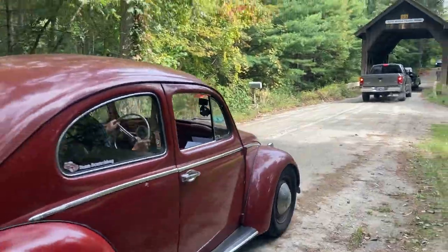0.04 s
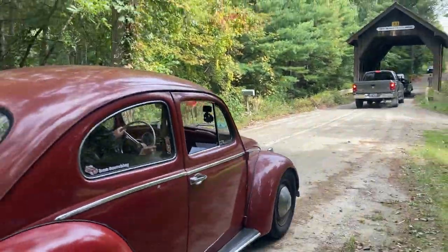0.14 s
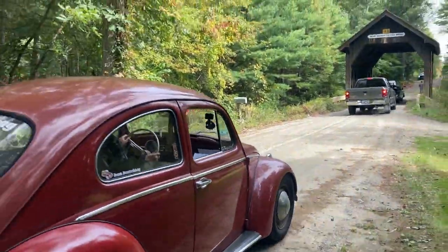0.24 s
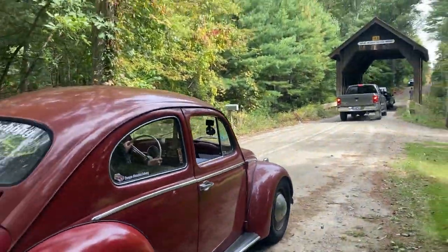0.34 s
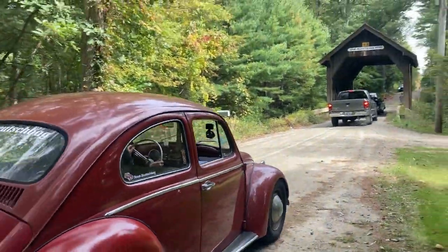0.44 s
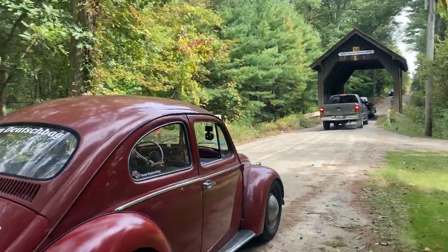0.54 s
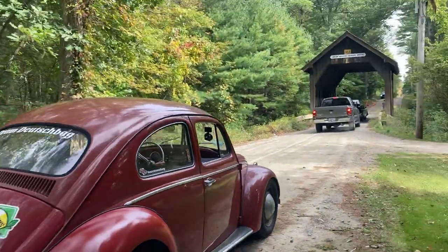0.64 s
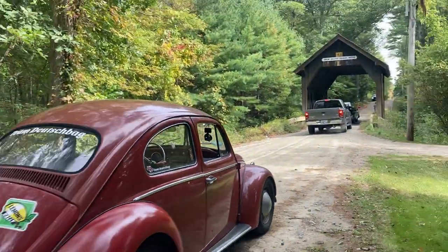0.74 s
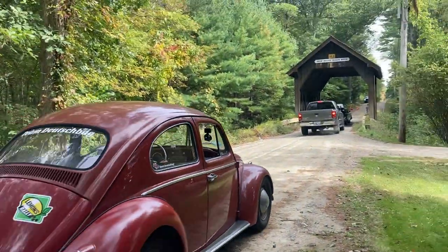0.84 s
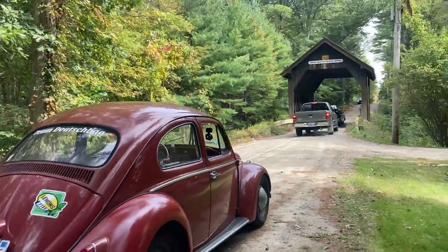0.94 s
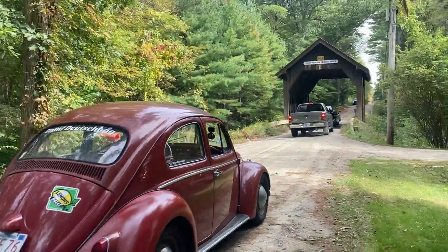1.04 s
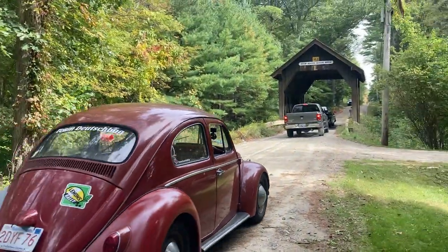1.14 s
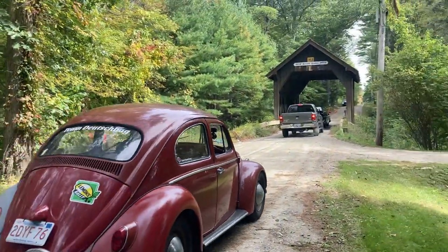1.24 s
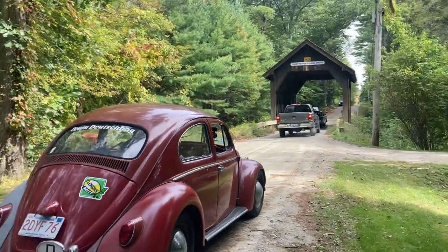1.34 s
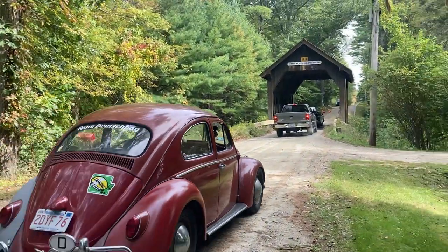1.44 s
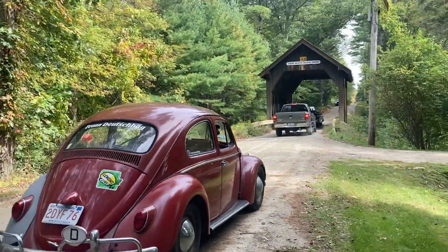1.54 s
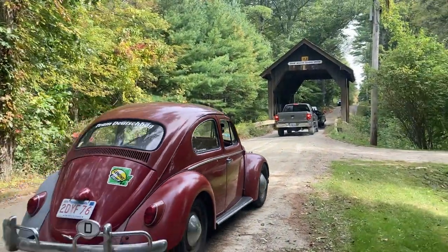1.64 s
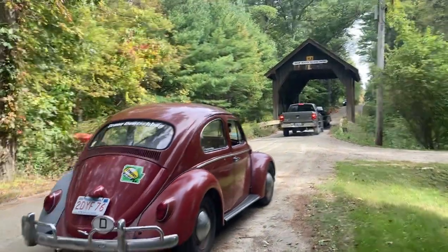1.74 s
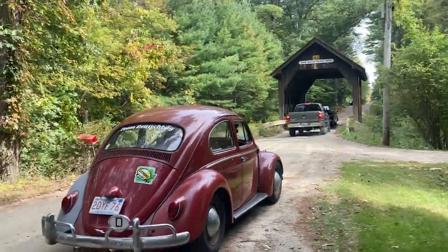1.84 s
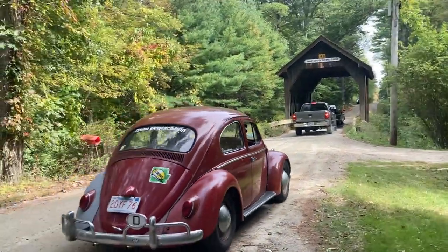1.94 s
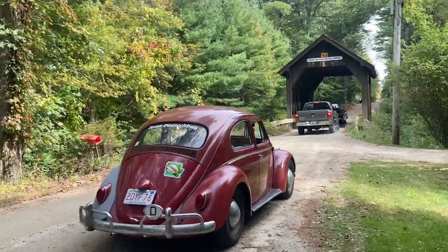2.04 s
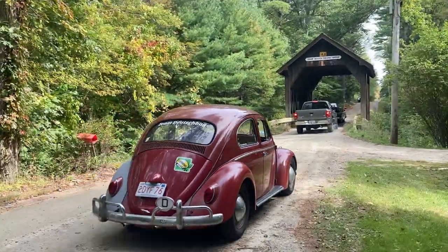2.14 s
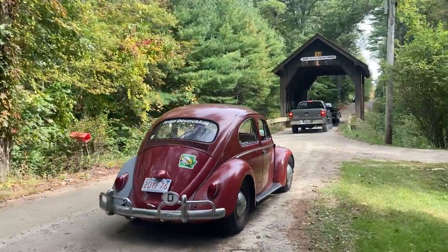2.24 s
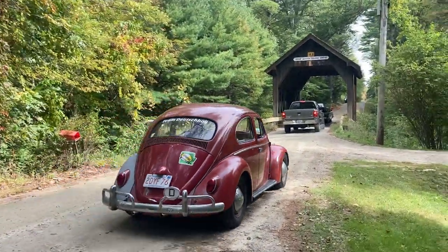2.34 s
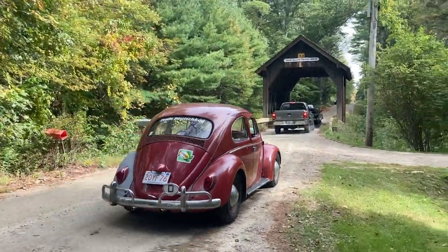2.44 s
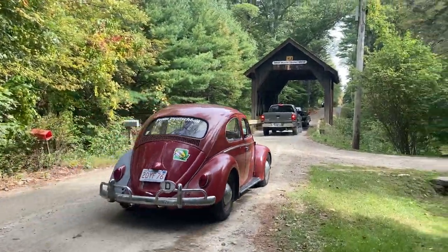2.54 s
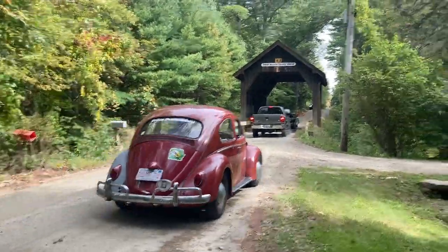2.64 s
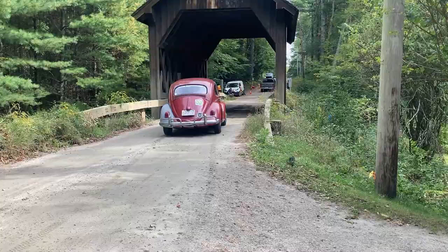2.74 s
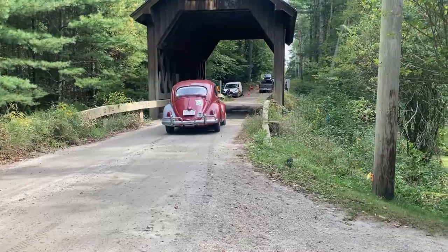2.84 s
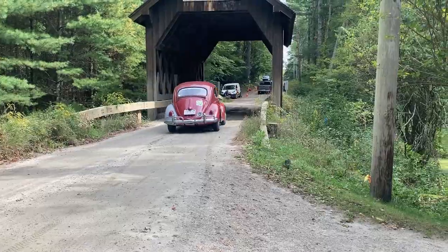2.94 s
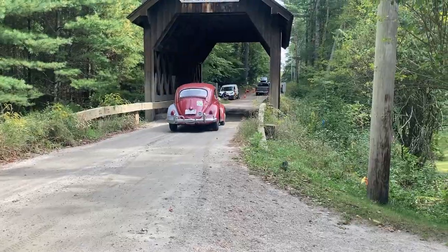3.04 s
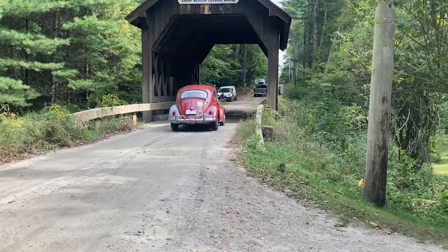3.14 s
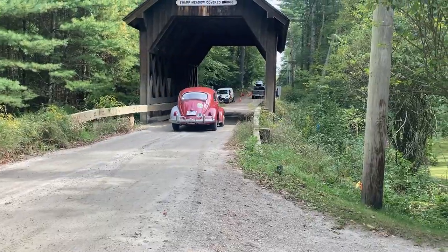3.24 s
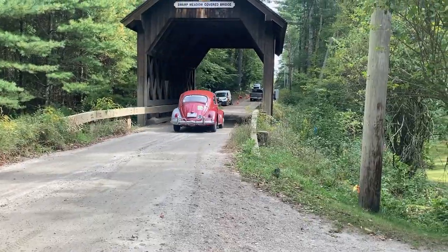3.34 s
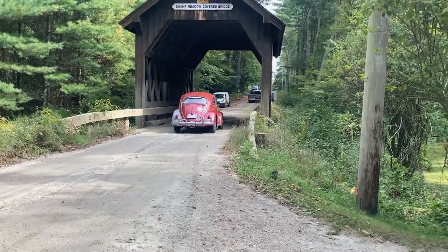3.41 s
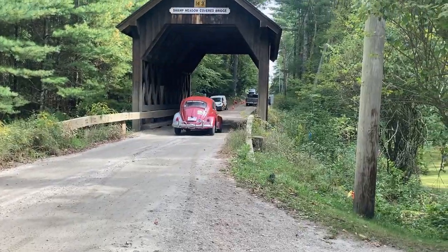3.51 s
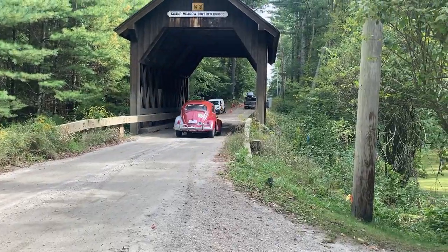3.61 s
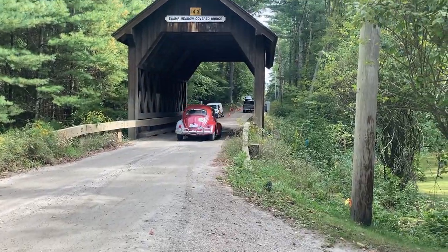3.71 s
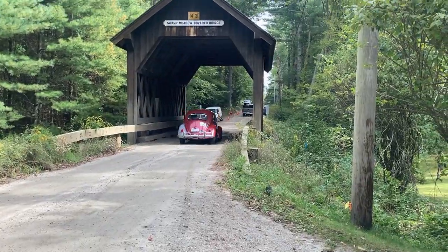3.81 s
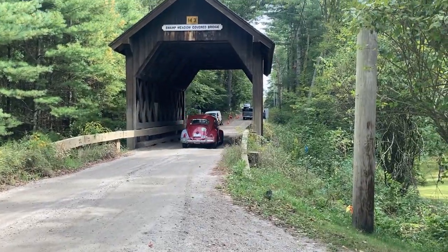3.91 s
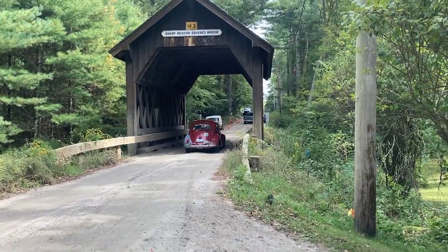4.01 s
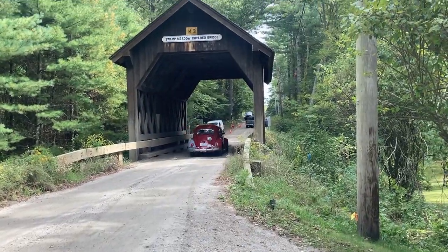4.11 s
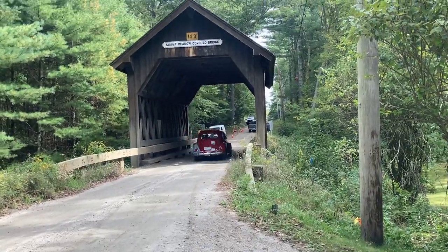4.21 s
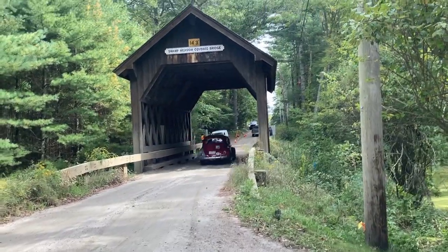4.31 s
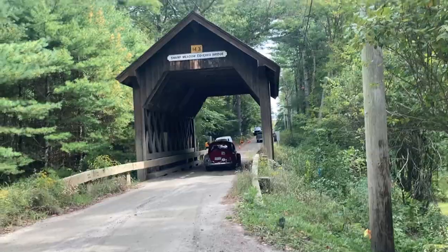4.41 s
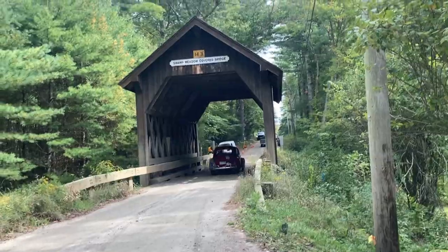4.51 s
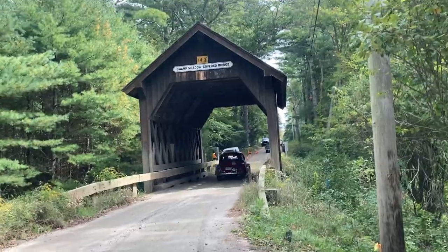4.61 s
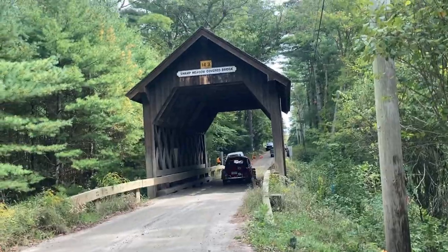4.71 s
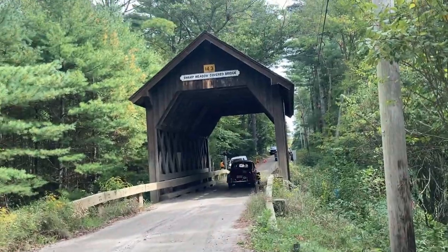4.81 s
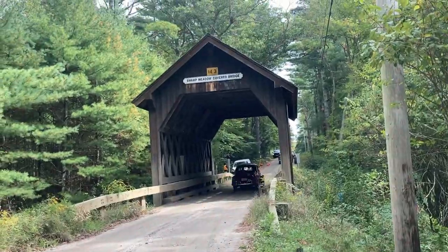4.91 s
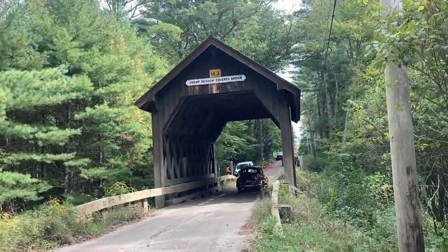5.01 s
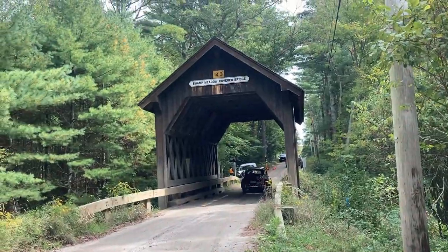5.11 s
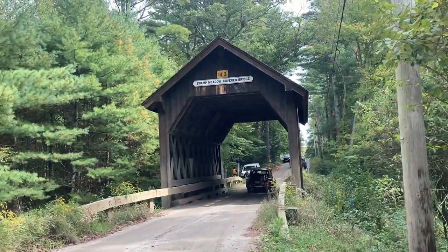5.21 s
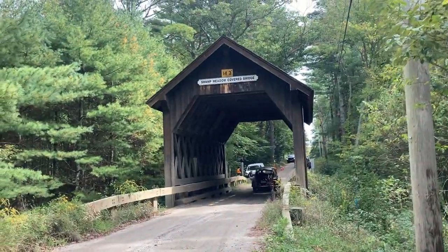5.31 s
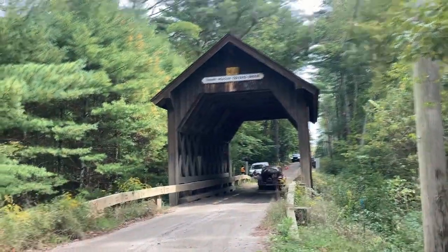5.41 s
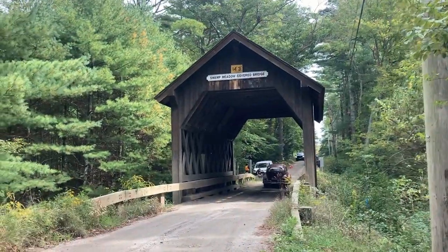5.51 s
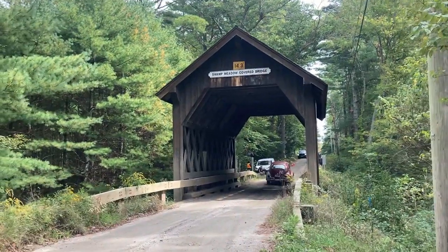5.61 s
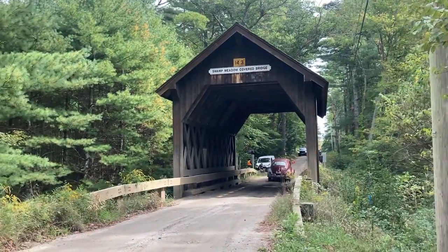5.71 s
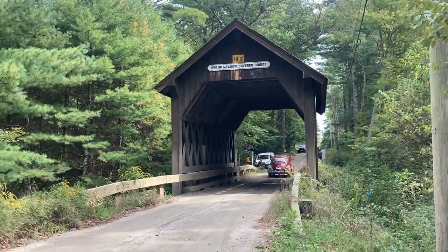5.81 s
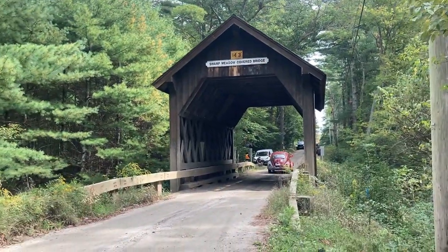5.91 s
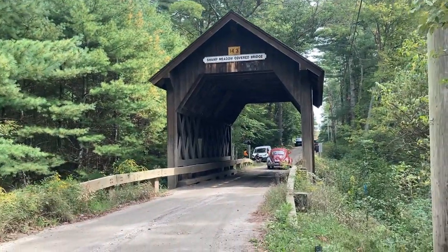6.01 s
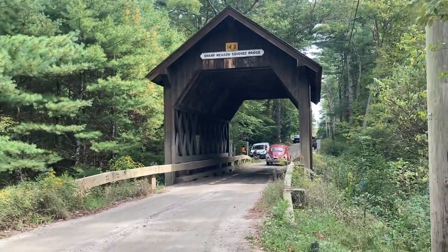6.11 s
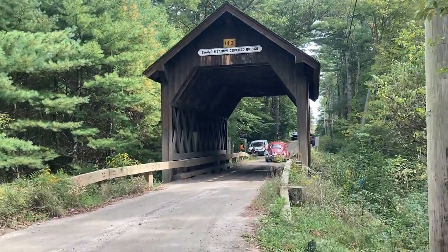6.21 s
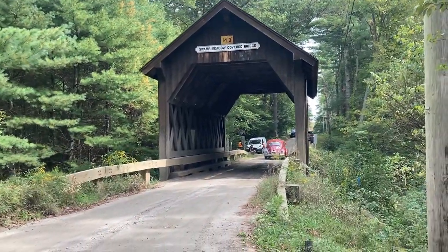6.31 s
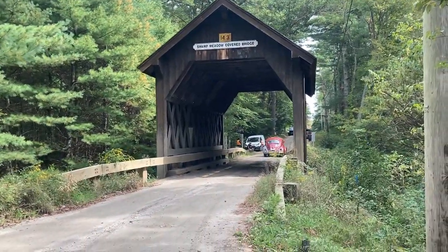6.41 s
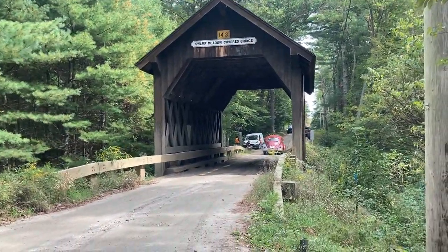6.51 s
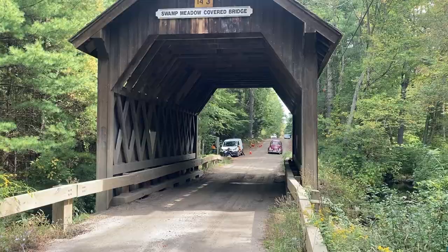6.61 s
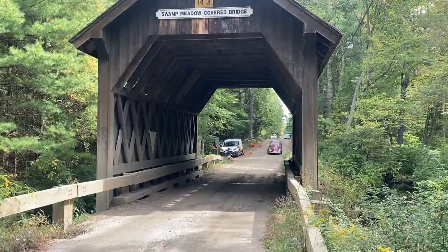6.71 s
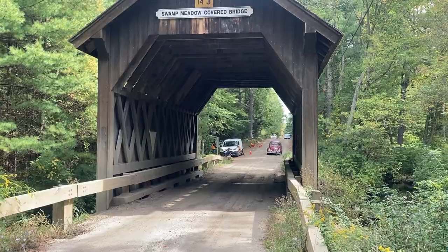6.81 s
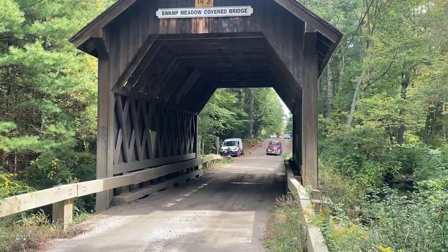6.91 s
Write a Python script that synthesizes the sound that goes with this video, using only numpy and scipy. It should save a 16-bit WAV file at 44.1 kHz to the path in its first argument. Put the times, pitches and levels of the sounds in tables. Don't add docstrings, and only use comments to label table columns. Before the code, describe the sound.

Outdoors on a wooded gravel road, an old air-cooled four-cylinder car starts very close, thumping unevenly with sheet-metal clanks and fan hiss. Sharp high whistles chirp from its tailpipes as it revs and draws away. Around three seconds a smoother engine drone takes over, falling, then rising through a timber bridge with tyre noise before fading. Handheld stereo microphone, faint cricket trill.

```python
import sys
import numpy as np
from scipy import signal
from scipy.fft import rfft, irfft, next_fast_len
from scipy.io import wavfile
from scipy.ndimage import uniform_filter1d, minimum_filter1d, map_coordinates

SR = 44100
rng = np.random.default_rng(int(sys.argv[2]) if len(sys.argv) > 2 else 0)


def digitize_waveform(pressure):
    field = np.atleast_2d(pressure).T
    bounded = np.clip(field, -1, 1)
    quanta = np.round(bounded * 32767).astype(np.int16)
    wavfile.write(sys.argv[1], SR, quanta)


def gain_from_decibels(decibels):
    exponent = np.asarray(decibels, float) / 20
    return 10 ** exponent


N = 306495
IDLE_SPEED = 10.02

# time_s, cycles_per_s
NEAR_SPEED = [(0, 9.75), (.4, 9.99), (.8, 10.083), (1.0, 9.349), (1.3, 9.858), (1.52, 9.462),
              (1.75, 12.485), (1.95, 11.362), (2.15, 11.162), (2.4, 10.623), (2.65, 9.913), (3.1, 10.002),
              (4, 9.98)]
# time_s, throttle_db, fade_db
NEAR_CAR = [(0, -2.5, 1.5), (.5, -1, 0), (.9, -0.5, -0.5), (1.4, -1.5, -0.5), (1.9, -2.5, -6),
            (2.4, -2.5, -5.5), (2.8, -5, -8), (3.0, -9, -10), (3.2, -9.5, -14.5), (3.6, -19.5, -30),
            (4.0, -43, -69)]
# time_s, twice_firing_rate_hz, drone_db
FAR_CAR = [(2.7, 96.9, -70), (3.0, 93.57, -25.5), (3.24, 82.23, -44), (3.54, 72.26, -27),
           (3.8, 65.9, -24.5), (4.16, 56.97, -32), (4.4, 59.8, -27.5), (4.7, 62.56, -27.5),
           (4.97, 65.4, -27), (5.16, 67.3, -31.5), (5.5, 70.85, -27.5), (5.65, 72.7, -29),
           (5.98, 74.36, -31), (6.13, 73, -29), (6.2, 67.16, -36), (6.4, 63.9, -42), (6.55, 62, -53),
           (6.7, 62, -99)]
# frequency_hz, density_db (per Hz)
AIR_HISS = [(1200, -50.5), (2200, -18.5), (3500, 4), (5500, -1.5), (7000, 0), (9000, 0), (11500, -1.5),
            (14000, -7.5), (15500, -9), (15800, -15.5), (16900, -37), (17100, -60.5)]


def unit(x):
    return x / np.sqrt(np.mean(x ** 2) + 1e-20)


def along(points, hz):
    f, v = np.transpose(points)
    return np.interp(np.log(hz + 1), np.log(f + 1), v)


def curves(rows):
    s, *cols = np.transpose(rows)
    return [np.interp(np.arange(N) / SR, s, c) for c in cols]


def ramp(start_s, takes_s):
    return np.clip((np.arange(N) / SR - start_s) / takes_s, 0, 1)


def wobble(rate):
    return map_coordinates(rng.standard_normal(int(N * rate / SR) + 4), [np.arange(N) * rate / SR])


def mixed(*levels_db):
    return np.sqrt(sum(gain_from_decibels(db) ** 2 for db in levels_db))


def filtered(x, response):
    m = next_fast_len(N + SR // 2)
    return irfft(rfft(x, m) * response(np.fft.rfftfreq(m, 1 / SR)), m)[..., :N]


def chamber(modes):
    def response(f):
        ring = sum(gain_from_decibels(db) * c * w / (c * c - f * f + 1j * f * w) for c, w, db in modes)
        no_deep_bass = f / (f - 42j)
        no_treble = 520 ** 2 / (520 ** 2 - f * f + 600j * f)
        return -ring * (no_deep_bass * no_treble) ** 2
    return response


def rush(spectrum, patchy_db):
    # frequency_hz, correlation
    likeness = [(50, 1), (120, 1), (300, 0.97), (640, 0.86), (1400, 0.53), (3000, 0.45), (5000, 0.13),
                (6500, 1), (7500, 0.86)]
    z = signal.stft(rng.standard_normal((2, N)), nperseg=512)[2]
    field = uniform_filter1d(uniform_filter1d(rng.standard_normal(z.shape[1:]), 6, 0), 10, 1)
    pair = signal.istft(z * gain_from_decibels(patchy_db * unit(field)), nperseg=512)[1][:, :N]

    def response(hz):
        angle = np.arccos(np.clip(along(likeness, hz), -1, 1)) / 2
        return gain_from_decibels(along(spectrum, hz)) * [np.cos(angle), np.sin(angle)]
    mid, side = filtered(pair, response)
    return unit(np.array([mid + side, mid - side]))


def knocks(rows, spread):
    out, t = np.zeros(N + SR), np.arange(SR // 10) / SR
    for s, db, hz, ms in rows:
        band = signal.butter(2, [hz / spread, min(hz * spread, 16000)], "band", fs=SR)
        burst = signal.lfilter(*band, rng.standard_normal(len(t)) * gain_from_decibels(-60000 * t / ms))
        out[round(s * SR):][:len(t)] += gain_from_decibels(db) * burst / abs(burst).max()
    return out[:N]


def cricket():
    t = np.arange(N) / SR
    hz, width_hz, chirps_per_s = 6700, 350, 38.5
    wing = filtered(rng.standard_normal(N), lambda f: 1 / (1 + ((f - hz) * 2 / width_hz) ** 2))
    strokes = (1 + np.cos(2 * np.pi * chirps_per_s * (t - .021))) ** 2
    return gain_from_decibels(-72 + 2 * wobble(6)) * unit(wing * strokes)


def roadside_ticks():
    # start_s, peak_db, pitch_hz, t60_ms
    tick_rows = [(4.602, -35, 2000, 30), (4.85, -30, 900, 70), (4.868, -29, 480, 90),
                 (4.866, -33, 2000, 40), (4.867, -36, 3200, 30), (5.285, -33, 4200, 60),
                 (5.31, -33, 1300, 60), (4.47, -36, 1500, 30), (5.779, -31, 4300, 35),
                 (6.105, -34, 3500, 50), (5.779, -33, 12000, 25), (6.035, -28, 900, 60),
                 (6.036, -35, 1600, 40), (6.034, -33, 500, 60), (6.764, -38, 4500, 25),
                 (6.764, -37, 11000, 25), (6.784, -30, 500, 70), (6.787, -35, 1400, 25),
                 (6.764, -41, 7000, 20), (6.764, -43, 2500, 20), (6.786, -32, 900, 40),
                 (6.833, -42, 1300, 20), (6.836, -34, 1800, 20), (6.806, -26, 70, 80)]
    return knocks(tick_rows, spread=1.23)


def far_presence_db():
    arriving_db = 20 * np.log10(ramp(2.725, 0.31) + 1e-3)
    since_leaving_s = np.clip(np.arange(N) / SR - 6.074, 0, 1)
    return arriving_db - 85 * since_leaving_s ** 2


def rumble(far_db):
    # frequency_hz, density_db (per Hz)
    deep_spectrum = [(22, -40), (38, -8), (65, 0), (110, -4), (180, -6), (240, -14), (450, -21), (540, -45)]
    # start_s, level_db
    planks = [
        (6.93, -42),
    ]
    s = np.arange(N) / SR
    booms_db = [db - 9 * ((s - at) / 0.025) ** 2 for at, db in planks]
    near_db = -29.5 + 0.19 * curves(NEAR_CAR)[1]
    level = mixed(near_db, -39 + far_db, -45, *booms_db)
    return level * gain_from_decibels(wobble(8)) * rush(deep_spectrum, patchy_db=1)


def faint_swell():
    # frequency_hz, density_db (per Hz)
    swell_spectrum = [(1700, -13), (2200, 1), (2900, -5), (3400, -26)]
    from_middle = (np.arange(N) / SR - 3.72) / .4
    return gain_from_decibels(-45 - 6.7 * from_middle ** 2) * rush(swell_spectrum, patchy_db=6.5)


def road(far_db):
    # frequency_hz, density_db (per Hz)
    tyre_spectrum = [(200, 4.5), (310, 7), (410, -19.5), (555, -0.5), (650, -3), (770, 1.5), (1100, -9),
                     (1480, -9.5), (1900, -14), (2500, -17), (4300, -29), (5000, -44.5)]
    # frequency_hz, width_hz, level_db
    bridge_modes = [(517, 220, -1.5), (791, 38, 3)]
    rolling_db = far_db + 4.5 * np.log2(curves(FAR_CAR)[0] / 65)
    woods_db = -46.5 + 5.5 * ramp(6.74, 0.017)
    tyres = rush(tyre_spectrum, patchy_db=1.5)
    hollow = gain_from_decibels(-6) * unit(filtered(tyres, chamber(bridge_modes)))
    return mixed(-35.5 + rolling_db, woods_db) * gain_from_decibels(0.76 * wobble(13)) * (tyres + hollow)


def far_engine():
    # multiple, level_db
    order_rows = [(1.5, -7), (1.75, -17), (2.25, -17), (2.5, 0), (2.75, -16), (3.5, -12), (4, -16),
                  (4.5, -18), (5.5, -16), (8, -18)]
    hz, drone_db = curves(FAR_CAR)
    lift = ramp(5.9, 0.17)
    load_db = drone_db - 8.5 * (1 - ramp(3.94, 0.23) + lift)
    upper_db = -7 + (drone_db + load_db) / 2

    def pipe_db(k):
        return -10 * np.log10(1 + ((k * hz - 194) * 2 / 44) ** 2)
    third_db = -5.5 + load_db + pipe_db(k=3)
    phase = 2 * np.pi * np.cumsum(hz * (1 + .003 * wobble(12))) / SR
    drone = gain_from_decibels(wobble(13)) * (np.sin(phase) + gain_from_decibels(-46.5) * np.sin(phase / 2))
    upper = 0
    for k, db in order_rows:
        level = gain_from_decibels(db + .12 * pipe_db(k) + 1.5 * wobble(6))
        upper = upper + level * np.sin(k * phase + 6 * rng.random())
    third = gain_from_decibels(1.2 * wobble(7)) * np.sin(3 * phase)
    overrun = gain_from_decibels(drone_db - 14 + 8 * lift + 2 * wobble(6.1)) * np.sin(2 * phase)
    return np.sqrt(2) * (gain_from_decibels(drone_db) * drone + gain_from_decibels(upper_db) * upper + gain_from_decibels(third_db) * third + overrun)


def firings(column, early_s, scatter_db, thins=None):
    # cycle_place (0-1), thump_db, bark_db, puff_db,
    # thump_growth_db, bark_growth_db (both per cycle a second over idle)
    cylinders = [(.0944, -3, 4, -2, -11.5, -4), (.375, -20, -15.5, -4, -7, 5), (.5943, -6.5, -8, 0, -9, 0),
                 (.8563, 2, -13, -3, -6.5, -3)]
    speed = curves(NEAR_SPEED)[0]
    turned = np.cumsum(speed)[:4 * SR] / SR
    rows = np.array(cylinders)
    places = (np.arange(int(turned[-1]))[:, None] + rows[:, 0]).ravel()
    times = np.interp(places, turned, np.arange(len(turned)) / SR)
    luck = rng.standard_normal((len(places), 2))
    at = np.round((times - early_s + 0.00046 * luck[:, 0]) * SR).astype(int)
    size_db = np.resize(rows[:, column], len(places)) + scatter_db * luck[:, 1]
    if thins:
        revving = np.clip(speed[(times * SR).astype(int)] - IDLE_SPEED, 0, 3)
        size_db = size_db + np.resize(rows[:, thins], len(places)) * revving
    return np.bincount(at[at >= 0], gain_from_decibels(size_db)[at >= 0], N)


def tailpipe_puffs():
    t = np.arange(SR // 20) / SR
    swell = t / 0.0061 * np.exp(1 - t / 0.0083)
    return signal.fftconvolve(firings(column=3, early_s=0.016, scatter_db=5.0), swell)[:N]


def hiss(puffs, far_db):
    pulsing = 3 * 0.26 * (0.053 + 0.68 * ramp(0, 0.68))
    fan = gain_from_decibels(-37.5 + curves(NEAR_CAR)[1]) * (1 + pulsing * puffs)
    return np.hypot(fan, mixed(-45 + far_db, -71)) * rush(AIR_HISS, patchy_db=1.5)


def casing(puffs):
    # frequency_hz, density_db (per Hz)
    casing_spectrum = [(300, 4.5), (450, 6), (580, -3.5), (750, -3), (910, -7), (1150, -4), (1400, -10),
                       (1800, -9), (2250, -9.5), (2800, -9), (3450, -12.5), (4200, -35)]
    level = gain_from_decibels(-30 + curves(NEAR_CAR)[1] + 1.82 * wobble(60))
    return level * (1 + 0.4 * puffs) * rush(casing_spectrum, patchy_db=1.4)


def rattle():
    # frequency_hz, width_hz, level_db
    panels = [(907, 110, -5.5), (1464, 500, -8.5), (2244, 140, -4), (4080, 360, -6)]
    # start_s, peak_db, pitch_hz
    clank_rows = [(0.029, -9.5, 890), (0.057, -16, 880), (0.132, -14.5, 870), (0.179, -15, 920),
                  (0.234, -14, 860), (0.31, -24, 946.5), (0.436, -18, 1160), (0.486, -20, 1040),
                  (0.534, -23, 969), (0.638, -11.5, 1100), (1.042, -20, 1220), (1.144, -15.5, 1500),
                  (1.351, -11.5, 1310), (1.454, -18, 1220), (1.993, -26, 734.4), (2.116, -28, 870),
                  (2.204, -21, 1050), (2.36, -26, 743), (2.544, -36, 907), (2.66, -23, 730)]
    # start_s, peak_db, pitch_hz
    tappet_rows = [(0.3867, -19, 3530), (0.4857, -27, 3370), (0.587, -22, 3452), (0.6852, -19, 3400),
                   (0.8015, -19.5, 3540), (1.0933, -28, 3680), (1.1666, -31, 3270), (1.1941, -27, 3720),
                   (1.2709, -23, 3720), (2.355, -30, 3830), (2.5949, -31, 3600)]
    shape = (len(panels), N)
    taps = (rng.random(shape) < 90 / SR) * rng.standard_normal(shape)
    c, w, db = np.transpose(panels)[:, :, None]
    ring = filtered(taps, lambda f: gain_from_decibels(db) * (1j * f * w / (c * c - f * f + 1j * f * w)) ** 2).sum(0)
    clanks = knocks([(s, peak - 8.5, hz, 47) for s, peak, hz in clank_rows], spread=1.127)
    valve = knocks([(s, peak - 2, hz, 160) for s, peak, hz in tappet_rows], spread=1.08)
    return gain_from_decibels(-36.5 + curves(NEAR_CAR)[1]) * unit(ring) + clanks + valve


def ground(x):
    # time_s, lag_ms
    bounce = [(0, .86), (1.1, .82), (1.5, .87), (2, 1.0), (2.35, 1.06), (2.7, .95), (3, 1.05), (3.4, 1.35),
              (3.8, 1.6), (4.3, 1.45), (4.8, 1.4), (5.4, 1.32), (5.8, 1.62), (6.95, 1.65)]
    lag_ms, at = curves(bounce)[0], np.arange(N)
    dull = uniform_filter1d(x, size=4, axis=1)

    def late(ms):
        return np.array([np.interp(at - ms * SR / 1000, at, v) for v in dull])

    def shaded(hz, width_hz, share, from_s, to_s):
        band = filtered(x, lambda f: share * np.exp(-((f - hz) / width_hz) ** 2))
        return (ramp(from_s, .2) - ramp(to_s, .2)) * band
    shade = shaded(570, 70, .7, 1.5, 2.6) + shaded(5150, 350, .45, 1.75, 2.8)
    return x - shade + gain_from_decibels(-10) * late(lag_ms) + gain_from_decibels(-17) * late(lag_ms + .4)


def noises():
    far_db, puffs = far_presence_db(), tailpipe_puffs()
    above_road = casing(puffs) + rattle() + road(far_db) + hiss(puffs, far_db)
    return rumble(far_db) + faint_swell() + ground(above_road)


def stumbling():
    # time_s, dip_db
    weak_firings = [
        (.565, -4.5),
        (.765, -2),
        (1.385, -7),
        (1.485, -9),
    ]
    t = np.arange(N) / SR
    return curves(NEAR_CAR)[0] + sum(db * np.exp(-((t - s) / .02) ** 2) for s, db in weak_firings)


def lope():
    # cycle_multiple, cycle_place (0-1), idle_db, growth_db (per cycle a second over idle), far_gain_db
    lope_rows = [(4, .1516, -30, -2.5, 1), (5, .183, -24.5, 1.5, -2.5), (6, .078, -31, 2, 1.5),
                 (7, .125, -28.5, 1, -7), (8, .085, -22, -4, -1), (16, .044, -43.5, -1.5, 18)]
    speed, throttle_db = curves(NEAR_SPEED)[0], stumbling()
    turned, revving = np.cumsum(speed) / SR, np.clip(speed - IDLE_SPEED, 0, 2)
    far_off = ramp(2.3, 0.37)
    out = 0
    for k, place, db, grows, far in lope_rows:
        level_db = 3 + db + throttle_db + grows * revving + far * far_off + .8 * wobble(4)
        out = out + gain_from_decibels(level_db) * np.cos(2 * np.pi * k * (turned - place))
    return out


def whistles():
    # rise_time_s (at 40 % of the peak), peak_db, pitch_hz, width_ms (at 40 % of the peak)
    whistle_rows = [(0.7992, -31, 11020.0, 7.4), (0.8524, -25, 10950.0, 5), (0.8805, -17, 9970, 1.3),
                    (0.9579, -9, 10270, 2.6), (1.064, -9, 10300, 2.1), (1.1681, -15.5, 10000, 3.4),
                    (1.195, -24.7, 10560.0, 7.2), (1.2707, -14, 10250, 3.4), (1.318, -25.5, 10780.0, 4.7),
                    (1.3998, -14, 10160, 1.66), (1.4222, -27, 11600, 6.2), (1.505, -7, 10170, 2.1),
                    (1.5291, -9, 10300, 3), (1.5777, -4, 10870, 5.1), (1.6024, -5, 11100, 2.9),
                    (1.6236, -6, 10660, 2.8), (1.6672, -1, 11380.0, 4.8), (1.69, -7.5, 11360, 3.7),
                    (1.7092, -16.5, 11000, 3.7), (1.7512, -18.5, 10900, 6.7), (1.773, -27, 11600, 6.4),
                    (1.7918, -15, 11000, 5.1), (1.8323, -13.7, 11600, 3.5), (1.8555, -21, 11520.0, 3),
                    (1.8748, -20, 10900, 4.2), (1.9175, -9, 10870.0, 3.3), (1.962, -12, 10900, 4.6),
                    (2.008, -11.7, 11320.0, 4.6), (2.0311, -12, 11400, 4.2), (2.052, -14.5, 10900, 4.1),
                    (2.1184, -10.5, 11080, 5)]
    # start_s, peak_db
    puff_rows = [(0.9028, -25), (1.0091, -18.5), (1.0919, -24), (1.115, -23.5), (1.218, -19), (2.2294, -29),
                 (2.3055, -29), (2.3515, -28), (2.3989, -31), (2.445, -29), (2.4967, -45), (2.5935, -37),
                 (2.6444, -30), (2.743, -28), (2.7644, -36), (2.795, -30), (2.843, -28), (2.8958, -30),
                 (2.945, -30), (3.044, -31)]
    # frequency_hz, density_db (per Hz)
    spray_spectrum = [(9500, -30.5), (10500, -2), (12200, -2), (13200, -7), (14000, -29.5)]
    tone, gate, torn = np.zeros(N), np.zeros(N), np.zeros(N)
    t = np.arange(SR // 25) / SR
    onset = 1 - np.exp(-t / .002)
    for s, db, hz, ms in whistle_rows:
        whole_s = 1.75 * ms / 1000
        u = np.clip(t / whole_s, 0, 1)
        arch = np.sin(np.pi * u) ** 2
        flutter = gain_from_decibels(2 * np.interp(t, np.arange(41) / 1000, rng.standard_normal(41)))
        broken = 1 - .55 * (ms > 4.55) * np.exp(-((u - .57) / .05) ** 2)
        phase = 2 * np.pi * np.cumsum(hz * (1.01 - .22 * (u - .4) ** 2)) / SR
        at = round((s - .22 * whole_s) * SR)
        tone[at:at + len(t)] += gain_from_decibels(db) * flutter * broken * arch * np.sin(phase)
        torn[at:at + len(t)] += gain_from_decibels(db - 16) * arch
        gate[at:at + len(t)] += gain_from_decibels(-19.5 + 0.32 * db) * onset * np.exp(-(t / 0.0095) ** 2)
    for s, db in puff_rows:
        gate[round((s - .001) * SR):][:len(t)] += gain_from_decibels(db - 2.5) * onset * np.exp(-(t / 0.01) ** 2)
    air = gate * rush(AIR_HISS, patchy_db=2) + torn * rush(spray_spectrum, patchy_db=1)
    return .75 * np.tanh(tone / .75) + air


def exhaust():
    # frequency_hz, width_hz, level_db
    silencer = [(80.2, 12.4, -5.5), (102.6, 29.4, -4.5)]
    # frequency_hz, width_hz, level_db
    tailpipe = [(138.4, 9, -10), (162.8, 11.2, -5), (195, 13.6, -5), (279, 30, -19), (437, 17.5, -23)]
    # frequency_hz, width_hz, level_db
    long_pipe = [(186, 24, 0)]
    # delay_s, level_db
    echo_rows = [(.0092, -13), (.0215, -4), (.0562, -9)]
    thump = filtered(firings(column=1, early_s=.0067, scatter_db=1, thins=4), chamber(silencer))
    bark = filtered(firings(column=2, early_s=.0032, scatter_db=1.2, thins=5), chamber(tailpipe))
    bark = bark + sum(gain_from_decibels(db) * np.roll(bark, round(s * SR)) for s, db in echo_rows)
    loaded = ramp(1.5, .04) - ramp(2.27, .1)
    honk = filtered(firings(column=2, early_s=.002, scatter_db=1.5), chamber(long_pipe))
    pipes = gain_from_decibels(-27) * unit(bark) + gain_from_decibels(-27) * loaded * unit(honk)
    return gain_from_decibels(-23.5 + stumbling()) * unit(thump) + gain_from_decibels(curves(NEAR_CAR)[0]) * pipes


def scene():
    background = cricket() + roadside_ticks() + noises()
    return background + far_engine() + lope() + whistles() + exhaust()


def ceiling(x):
    return x / (1 + abs(x / .92) ** 8) ** (1 / 8)


def sparing(pair):
    hz, _, z = signal.stft([pair[0] + pair[1], pair[0] - pair[1]], SR, nperseg=1024)
    power = uniform_filter1d(abs(z) ** 2, size=12, axis=1)
    treble = power[:, hz > 9000].sum((0, 1))
    calm = treble < 20 * minimum_filter1d(treble, size=5)
    weak = (power < gain_from_decibels(-13) * power[::-1]) & (hz > 4300)[:, None]
    weak |= hz[:, None] > np.array([15720, 15200])[:, None, None]
    kept = z * ~(weak & calm) * (hz < 16900)[:, None]
    both, apart = signal.istft(kept, SR, nperseg=1024)[1][:, :N]
    return np.array([both + apart, both - apart]) / 2


def starved(pair):
    hz, _, z = signal.stft(pair[:, :3 * SR], SR, nperseg=256)
    treble = (hz > 4500)[:, None]
    power = uniform_filter1d(abs(z) ** 2, size=4, axis=1) * treble
    loudest = -minimum_filter1d(-power.max((0, 1)), size=9)
    faint = (power < gain_from_decibels(2 * -39) * loudest) & treble
    lost = signal.istft(z * faint, SR, nperseg=256)[1][:, :3 * SR]
    return pair - np.pad(lost, [(0, 0), (0, N - 3 * SR)])


def top_cut(x):
    return signal.sosfilt(signal.butter(12, 16970, fs=SR, output="sos"), x)


def record(dry):
    # frequency_hz, level_db
    lean = [(100, -.5), (300, 1), (700, 3), (1300, 4), (2400, 1.5), (4400, 0.5)]
    # frequency_hz, phase_rad
    bass_turn = [(30, 0), (60, .05), (130, .14), (260, 0)]
    # time_s, lead_samples
    lead = [(0, 11), (1, 10), (1.6, 8), (2.2, 4.5), (3.2, 3.5), (4.5, 0), (5.7, -1.5), (6.95, 1)]
    sides = np.array([[.5], [-.5]])

    def low_share(hz):
        return 1 / (1 + (hz / 4300) ** 20)

    def low_response(hz):
        turn = np.exp(1j * sides * along(bass_turn, hz))
        bass_cut = np.sqrt(1 + (36 / (hz + 1)) ** 8)
        return low_share(hz) * gain_from_decibels(sides * along(lean, hz)) * turn / bass_cut

    def high_response(hz):
        lag = np.exp(-2j * np.pi * sides * (hz - 2320) / 4550)
        return np.sqrt(1 - low_share(hz) ** 2) * lag
    at, lead_samples = np.arange(N), curves(lead)[0]
    low = filtered(dry, low_response)
    low = np.array([np.interp(at + side * lead_samples, at, v) for side, v in zip(sides, low)])
    high = filtered(dry, high_response)
    return top_cut(starved(sparing(ceiling(low + high))))


dry = scene()
out = record(dry)
digitize_waveform(out)
```